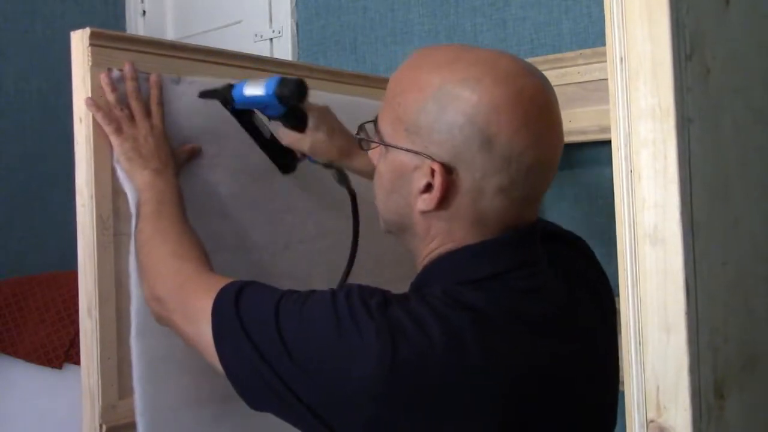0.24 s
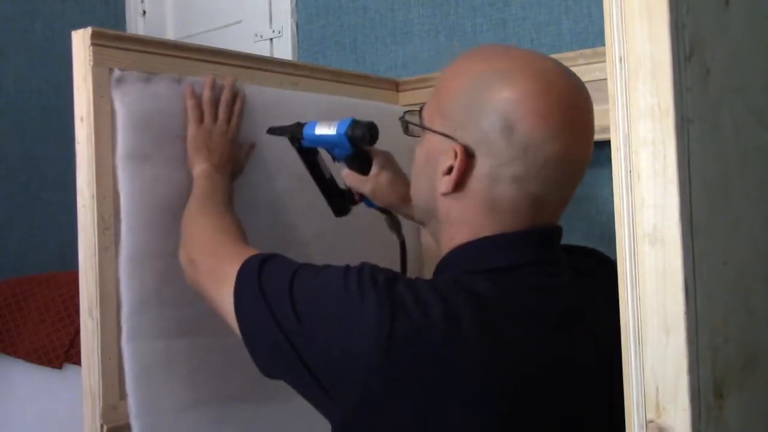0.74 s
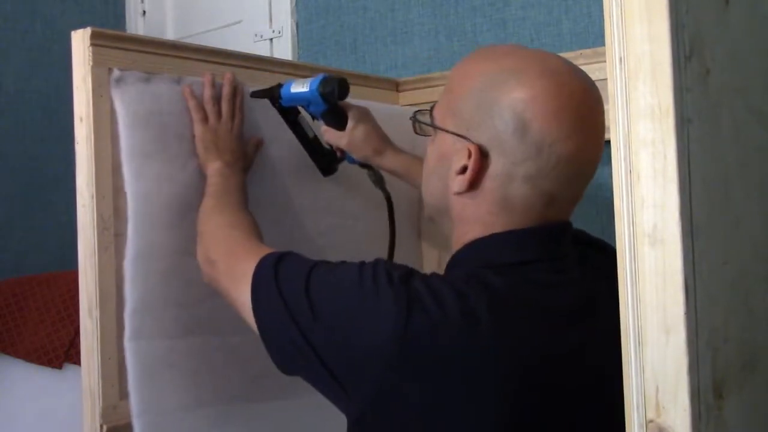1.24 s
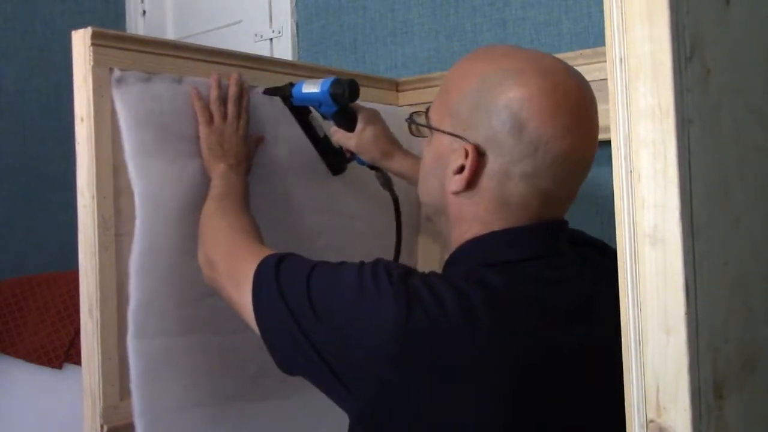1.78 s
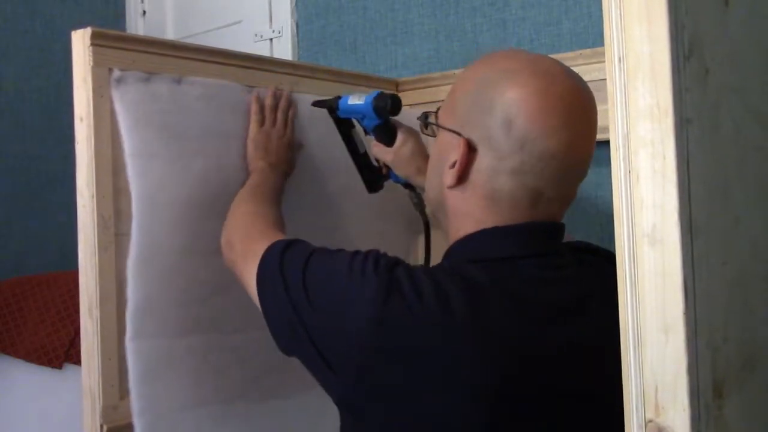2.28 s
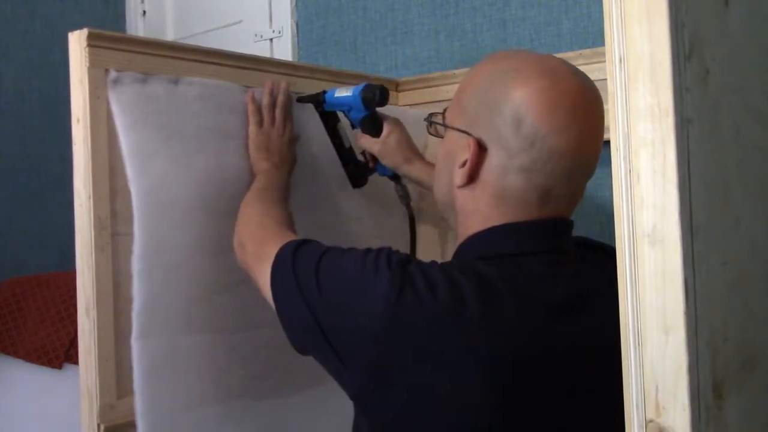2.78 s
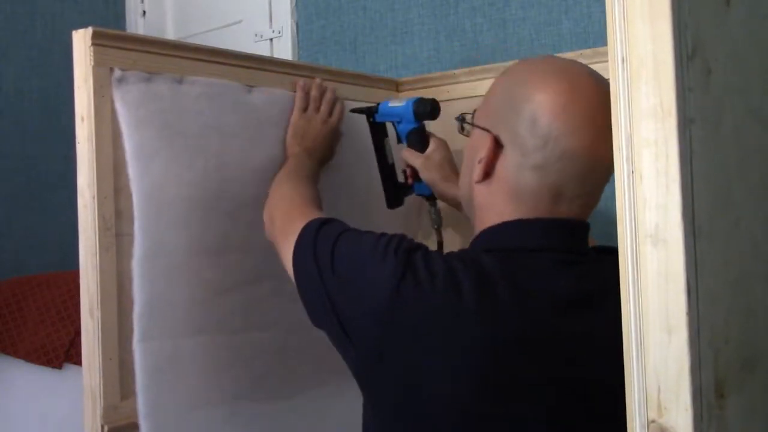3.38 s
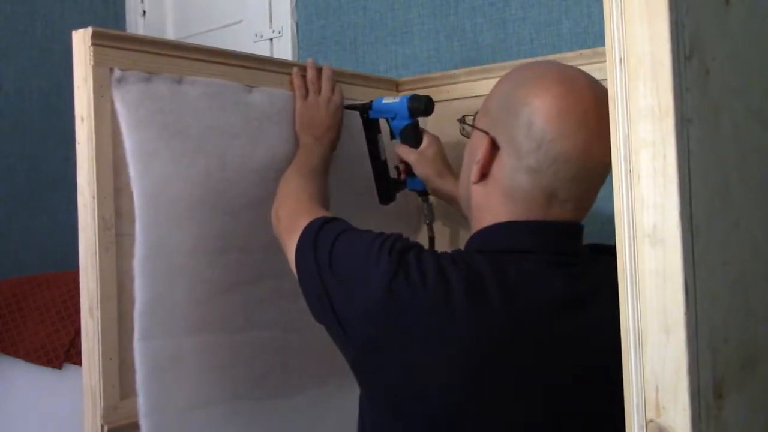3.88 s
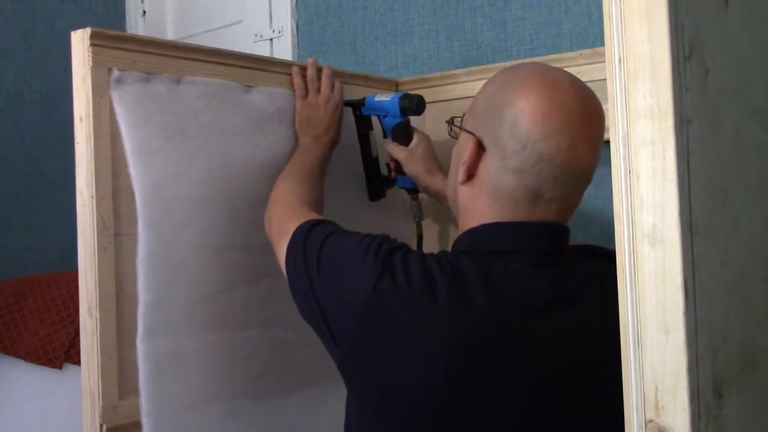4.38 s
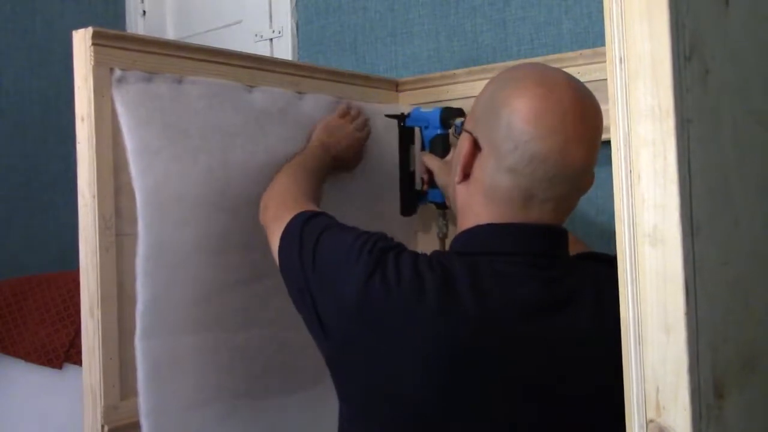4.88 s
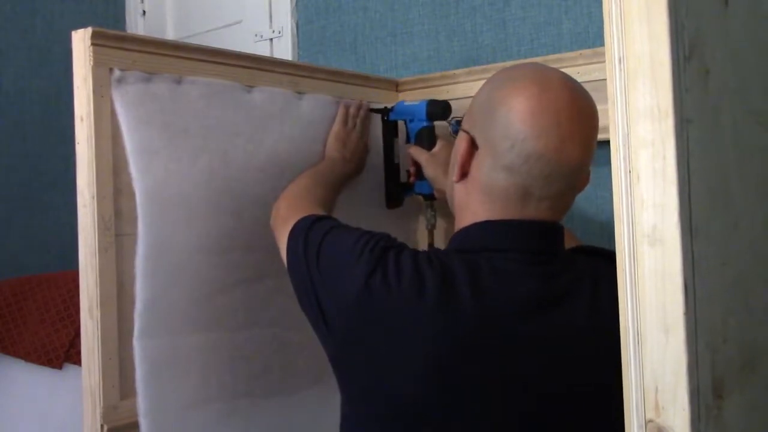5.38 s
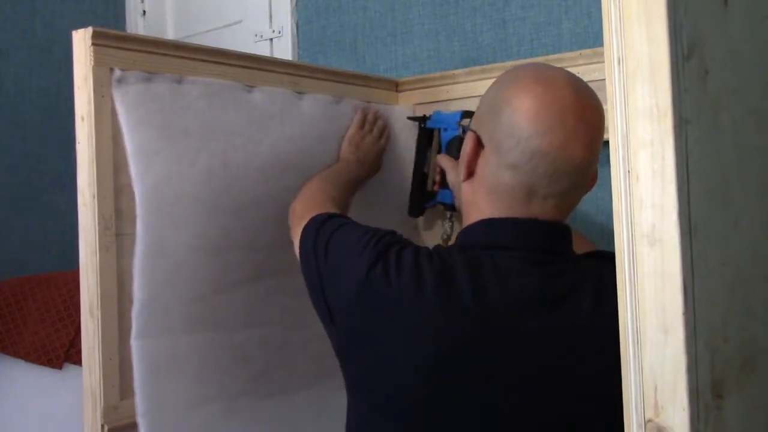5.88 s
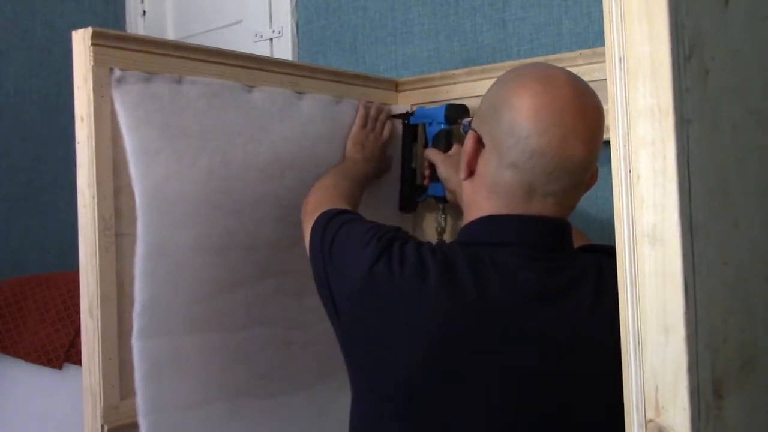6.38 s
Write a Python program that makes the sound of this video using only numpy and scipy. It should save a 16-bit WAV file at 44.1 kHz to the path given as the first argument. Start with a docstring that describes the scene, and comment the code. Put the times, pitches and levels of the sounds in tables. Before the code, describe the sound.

An air stapler fires five times into a padded wooden frame, starting at once, the shots a little over a second apart. Each is a sharp crack and thump, followed instantly by a puff of air and a clack. Soft wooden knocks fall between shots as the tool and fingers touch the frame. The air hose hisses faintly over low room tone, heard from nearby in a small room.

```python
"""An air stapler fires five times, tacking padding to a wooden frame in a small room.
Each shot is a spit of air, the driver's thump and the staple's crack; on release the exhaust puffs
and the piston clacks home. Soft knocks ring the frame as the nose is set down and fingers touch it.
Underneath, the air line hisses faintly over a low room tone.
A fast limiter squashes each shot and its echo toward one level."""
import sys
import numpy as np
from scipy import signal
from scipy.fft import rfft, irfft
from scipy.io import wavfile
from scipy.ndimage import uniform_filter1d, map_coordinates

SR = 44100
rng = np.random.default_rng(int(sys.argv[2]) if len(sys.argv) > 2 else 0)


def wav_record(signal):
    """Record a signal, one row per channel, as 16-bit PCM in the file named by sys.argv[1]."""
    frames = np.transpose(np.atleast_2d(signal))
    bounded = np.clip(frames, -1, 1)
    # unit amplitude maps onto the largest positive 16-bit level
    quanta = np.round(bounded * 32767).astype(np.int16)
    wavfile.write(sys.argv[1], SR, quanta)


N = 293265
TIME = np.arange(N) / SR
AGE = np.arange(int(.8 * SR)) / SR  # seconds into a one-shot sound

# Shot cues: driver fires t/s, trigger held t/s, lift of the gun afterwards height/m
SHOT_CUES = [(-.019, .1, .072), (1.5795, .1, .05), (2.783, .0925, .06), (4.427, .1005, .038),
             (5.518, .09, .032)]
# Nose and hand meeting the frame: t/s, tap level/dB, wood ring level/dB, scuff decay t/s
KNOCK_CUES = [(0.353, -52, -40.5, 0.0021), (.642, -29.5, -27, 0.0024), (1.467, -36.5, -63, .0055),
              (2.7237, -30.5, -33.5, 0.0058), (3.156, -33, -36, 0.01), (3.183, -32.5, -66, 0.0053),
              (3.2524, -32, -49, 0.0022), (4.335, -53.5, -46.5, .012), (5.433, -36, -43.5, 0.0055),
              (6.609, -39.5, -43, 0.0061)]
# The hose tugging at its coupling: start t/s, end t/s, extra hiss level/dB
HOSE_PULLS = [(0, .7, -50), (5.947, 6.087, -59)]

# Modes of the wooden frame and the gun's housing: f/Hz, level/dB, t60/s
FRAME_MODES = [(166, -19, 0.3), (225, -13.5, 0.2), (330, -4.5, .15), (415, 1.5, 0.13), (553, -15.5, .15),
               (723, -11, .18), (767, -12, 0.16), (990, -22, .15)]
HOUSING_MODES = [(500, 3, .06), (575, -3, .24), (1050, -8, .2), (1120, -8, .22), (1680, -19, .3),
                 (1735, -19, .3), (2450, -25, .2), (3310, -26, .2)]
# The room's decay: f/Hz, t60/s
ROOM_DECAY = [(80, 0.32), (250, 0.32), (600, 0.31), (1500, 0.26), (3000, 0.21), (7000, 0.21), (11000, 0.17),
              (16000, 0.24)]

# Tone colours, as EQ curves on noise: f/Hz, level/dB
RUMBLE_EQ = [(20, -22), (45, -12), (75, -18), (115, 0), (200, -2.5), (330, -2), (550, -9), (900, -13.5),
             (1300, -15), (1600, -19), (3000, -20.5), (6000, -28), (15000, -43)]  # the building
LEAK_EQ = [(200, -48), (1500, 0), (3000, -1), (4700, -1), (6000, 3), (8000, 6.5), (10300, 3), (12500, -4.5),
           (15500, -10.5)]  # leaking coupling
TAP_EQ = [(30, -28.5), (70, -19), (110, 2), (400, 4.5), (750, 1), (1400, -7.5), (2800, -12.5), (5000, -25),
          (9000, -29.5), (15000, -43.5)]  # touch through the padding
AIR_EQ = [(50, -38), (150, -25.5), (700, -13.5), (2000, 0.5), (3700, -4.5), (5100, -9), (6500, -0.5),
          (8000, 1.5), (10500, -4), (12500, -9), (15500, -20.5)]  # spit and exhaust
TICK_EQ = [(50, -7.5), (200, 1), (1000, -3.5), (2000, -7.5), (3500, -6), (5100, -4.5), (6400, 1),
           (8000, -9), (11000, -6), (15000, -54)]  # valve closing
HOLLOW_EQ = [(200, -40.5), (450, -7.5), (600, 6), (800, -15.5), (1000, 3.5), (1140, 5.5), (1300, -18),
             (2500, -26.5)]  # emptying cylinder
CLACK_EQ = [(60, -32), (100, -20), (170, -8), (280, -4), (550, 8), (800, 0), (1100, 5), (1450, -7),
            (1700, -3), (2100, -8), (3400, -5), (5000, -9), (15000, -27)]  # piston coming home
THUMP_EQ = [(30, -25), (130, -16.5), (300, 6.5), (550, 10.5), (800, -28.5), (2200, -4), (5000, -13.5),
            (10000, -22.5), (15000, -36.5)]  # driver's blow
CRACK_EQ = [(40, -33), (100, -13.5), (190, -11), (305, 2), (520, -1), (800, -3), (1200, -2.5), (2800, 0),
            (4200, -8.5), (5200, -15.5), (7300, -16), (10000, -33), (15000, -48.5)]  # staple biting wood
# The top of the hiss, beamed at the padded panel: f/Hz, level/dB
BEAM_EQ = [(4500, -24), (7500, -8), (10500, -10), (15000, -16)]
# Stereo width of the echo and the background bed: f/Hz, side against mid level/dB
ECHO_WIDTH = [(60, -29), (160, -37), (350, -36.5), (700, -28), (1400, -26), (5600, -17.5), (10000, -11.5),
              (14000, -30.5)]
BED_WIDTH = [(60, -11), (180, -19), (550, -11), (1650, -8.5), (4970, -18.5), (15000, -29)]
# Swell of the head valve's spit: t/s, level/dB
SPIT_SWELL = [(0, -55.5), (.004, -22.5), (.008, -10), (.014, -11), (.03, -60)]


def amp(db):
    """Decibels to gain."""
    return 10 ** (np.asarray(db) / 20)


def unit_rms(x):
    """Scales to rms 1."""
    return x / np.sqrt(np.mean(x ** 2) + 1e-20)


def curve_at(points, hz):
    """Reads a curve drawn in straight lines over log frequency."""
    f, value = np.transpose(points)
    return np.interp(np.log(hz + 1), np.log(f), value)


def add(mix, s, sound):
    """Drops a sound in at s seconds, trimmed to fit the mix."""
    start = round(s * SR)
    part, rest = mix[..., max(start, 0):], sound[..., max(-start, 0):]
    n = min(part.shape[-1], rest.shape[-1])
    part[..., :n] += rest[..., :n]


def equalise(x, eq):
    """Colours a sound without delaying it."""
    return irfft(rfft(x) * amp(curve_at(eq, np.fft.rfftfreq(len(x), 1 / SR))), len(x))


def noise(eq, size):
    """Steady coloured noise at rms 1."""
    return unit_rms(equalise(rng.standard_normal(size), eq))


def burst(eq, rise_s, decay_s):
    """A puff or hit: quick attack, exponential tail, the same colour at every stroke."""
    envelope = (1 - np.exp(-AGE / rise_s)) * np.exp(-AGE / decay_s)
    spectrum = np.fft.fft(rng.standard_normal(len(AGE)) * envelope)
    hz = abs(np.fft.fftfreq(len(AGE), 1 / SR))
    lumps = uniform_filter1d(abs(spectrum) ** 2, size=64, mode="wrap")
    log_gain = np.log(amp(curve_at(eq, hz)) / np.sqrt(lumps))
    # minimum phase: nothing sounds before the hit
    sound = np.fft.ifft(spectrum * np.exp(np.conj(signal.hilbert(log_gain)))).real
    return unit_rms(sound) * np.sqrt(np.mean(envelope ** 2))


def ring(modes, spread=.014):
    """Dying modes, detuned a little by where the strike lands."""
    detunes = 1 + spread * rng.uniform(-.42, 1, len(modes))
    return sum(amp(db - 60 * AGE / t60) * np.sin(2 * np.pi * hz * detune * AGE)
               for (hz, db, t60), detune in zip(modes, detunes))


def in_room(x, wet_db):
    """Direct sound plus a narrow stereo tail of dense reflections, fresh for every hit."""
    hz, t, spectra = signal.stft(rng.standard_normal((2, len(AGE))), SR, nperseg=256)
    decay = amp(-60 * t / curve_at(ROOM_DECAY, hz)[:, None])
    tails = signal.istft(spectra * decay, SR)[1][:, :len(AGE)]
    tails *= np.interp(AGE, [.003, .006], [0, 1])  # pre-delay
    mid, side = amp(wet_db) * tails / np.linalg.norm(tails, axis=1, keepdims=True)
    mid = mid + (AGE == 0)  # direct sound
    side = equalise(side, ECHO_WIDTH)
    return signal.fftconvolve(x[None], np.array([mid + side, mid - side]), axes=1)[:, :len(AGE)]


def room_tone(level_db=-54):
    """Low, steady rumble of the building."""
    return amp(level_db) * noise(RUMBLE_EQ, N)


def panel_detour(seated_m=.203, lift_s=.65):
    """Extra metres the hiss travels via the panel as the gun lifts after each shot and comes down."""
    fires, _, lifts = np.transpose(SHOT_CUES)
    landings = np.append(fires[1:], N / SR)
    return seated_m + sum(lift * np.interp(TIME, [fire, fire + lift_s, landing], [0, 1, 0])
                          for fire, landing, lift in zip(fires, landings, lifts))


def hose_spray(rise_s=.043, close_s=.072):
    """Each tug on the hose opens the coupling, which sprays all round and eases shut."""
    gain = sum(amp(db) * np.clip((TIME - start) / rise_s, 0, 1)
               * np.exp(-np.maximum(TIME - end, 0) / close_s) for start, end, db in HOSE_PULLS)
    return gain * noise(LEAK_EQ, N)


def air_leak(steady_db=-63, bounce_db=1):
    """The coupling's hiss flanges against its own bounce off the panel as the gun moves."""
    hiss = noise(LEAK_EQ, N)
    delay_s = panel_detour() / 343
    bounce = map_coordinates(equalise(hiss, BEAM_EQ), [(TIME - delay_s) * SR], order=3)
    return amp(steady_db) * unit_rms(hiss + amp(bounce_db) * bounce) + hose_spray()


def knock(tap_db, ring_db, scuff_s):
    """A scuffing touch through the padding sets the frame ringing."""
    tap = amp(tap_db) * burst(TAP_EQ, rise_s=.0004, decay_s=scuff_s)
    return in_room(tap, wet_db=3.5) + amp(ring_db) * ring(FRAME_MODES)


def handling(settle_s=.068, settle_db=-15, touches_per_s=5.7):
    """Knocks that settle with a softer second touch, and faint finger taps, as (start, sound) pairs."""
    for s, tap_db, ring_db, scuff_s in KNOCK_CUES:
        yield s, knock(tap_db, ring_db, scuff_s)
        yield s + settle_s, knock(tap_db + settle_db, ring_db + settle_db, scuff_s)
    for s in rng.uniform(0, N / SR, round(touches_per_s * N / SR)):
        yield s, knock(tap_db=-51, ring_db=-61.5, scuff_s=.0081)


def exhaust(return_s, reseat_s):
    """The cylinder vents, the piston pushes out a second puff, the valve ticks shut on a hollow note."""
    air = amp(-6.5) * burst(AIR_EQ, rise_s=.002, decay_s=.02)
    add(air, return_s, amp(7) * burst(AIR_EQ, rise_s=.0033, decay_s=.0075))
    add(air, return_s + reseat_s, amp(-1) * burst(TICK_EQ, rise_s=.0003, decay_s=.0082))
    add(air, return_s + reseat_s, amp(-8) * burst(HOLLOW_EQ, rise_s=.0094, decay_s=.013))
    return in_room(air, wet_db=-3.5)  # drier than the blow: the port faces the listener


def piston_clack():
    """The returning piston hits its stop and rings the housing."""
    clack = amp(4) * burst(CLACK_EQ, rise_s=.00063, decay_s=.0054)
    return in_room(clack, wet_db=-1.5) + amp(-6) * ring(HOUSING_MODES)


def firing(lead_s, drive_s=.0056):
    """The head valve spits, the driver hits the staple, the piston bottoms out as the staple bites."""
    swell = amp(np.interp(AGE, *np.transpose(SPIT_SWELL)))
    gun = swell * noise(AIR_EQ, len(AGE)) * (AGE < 2 * lead_s)
    bite_s = lead_s + drive_s
    add(gun, lead_s, amp(5.6) * burst(THUMP_EQ, rise_s=.00069, decay_s=.0046))
    add(gun, bite_s, amp(23.6) * burst(CRACK_EQ, rise_s=.0001, decay_s=.0024))
    hit = in_room(gun, wet_db=-2)
    add(hit, bite_s, amp(-9.9) * ring(FRAME_MODES))
    return hit


def stapler(lead_s=.01, return_s=.0176, reseat_s=.0313):
    """The trigger fires the gun; letting go vents it and returns the piston. Yields (start, sound)."""
    for fire, held, _ in SHOT_CUES:
        let_go = fire + held
        yield fire - lead_s, firing(lead_s)
        yield let_go, exhaust(return_s, reseat_s)
        yield let_go + return_s, piston_clack()


def scene():
    """Shots and knocks over a stereo bed of room tone and hiss."""
    mid = room_tone() + air_leak()
    side = equalise(room_tone() + air_leak(), BED_WIDTH)
    mix = np.array([mid + side, mid - side])
    for start, sound in [*stapler(), *handling()]:
        add(mix, start, sound)
    return mix


def record(dry):
    """A fast limiter flattens each shot; then a low cut, clipping of stray peaks and a high cut."""
    threshold_db, slope, recovery_db_per_s = -14, .79, 240
    attack_s, look_ahead_s = .0096, .0013
    low_cut_hz, high_cut_hz = 100, 15930
    pole = np.exp(-1 / (attack_s * SR))
    power = (dry ** 2).mean(0)
    opening_power = power[TIME < attack_s].mean()  # the limiter starts already clamped down
    smoothed = signal.lfilter([1 - pole], [1, -pole], power, zi=[opening_power])[0]
    level_db = 10 * np.log10(np.interp(TIME + look_ahead_s, TIME, smoothed) + 1e-12)
    fall_db = recovery_db_per_s * TIME
    peak_db = np.maximum.accumulate(level_db + fall_db) - fall_db
    over_db = np.maximum(peak_db - threshold_db, 0)
    limited = dry * amp(-slope * uniform_filter1d(over_db, size=96))
    low_cut = signal.butter(2, low_cut_hz, "high", fs=SR, output="sos")
    high_cut = signal.firwin(511, high_cut_hz, window=("kaiser", 8), fs=SR)
    clipped = np.clip(signal.sosfilt(low_cut, limited), -1, 1)
    return signal.oaconvolve(clipped, high_cut[None], "same")


dry = scene()
out = record(dry)
wav_record(out)
```